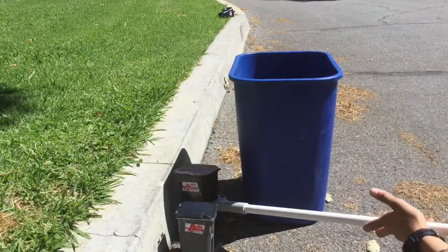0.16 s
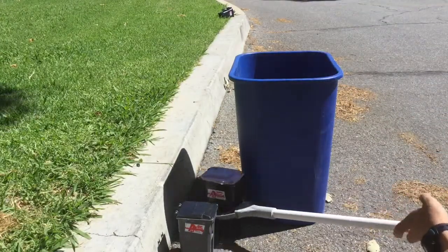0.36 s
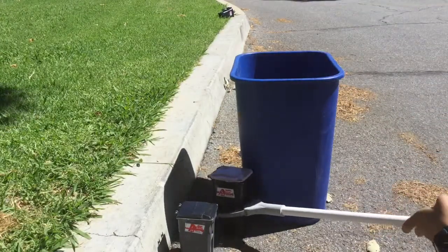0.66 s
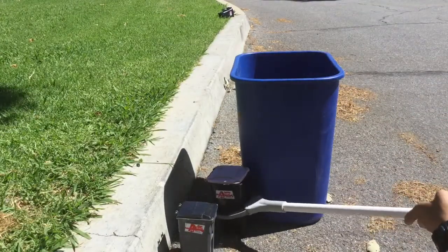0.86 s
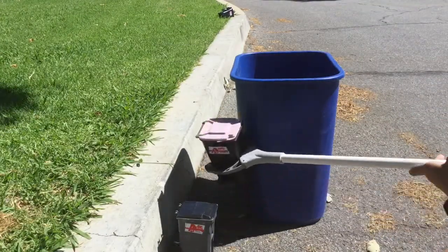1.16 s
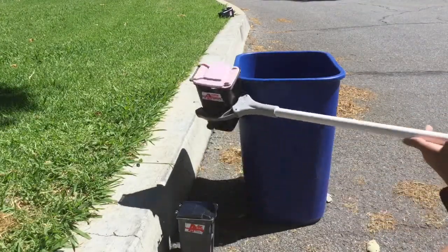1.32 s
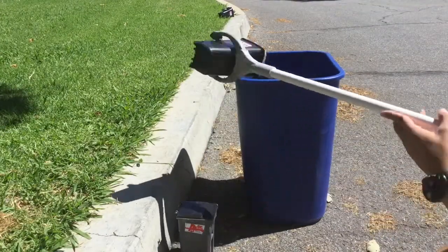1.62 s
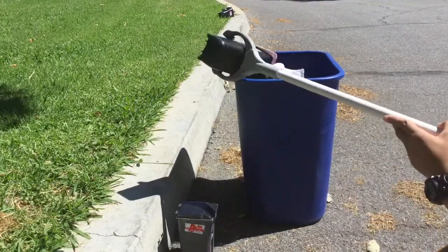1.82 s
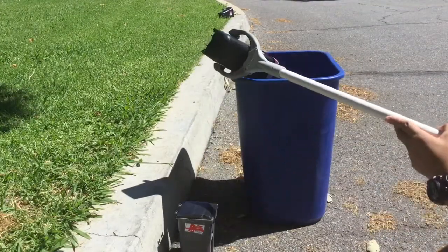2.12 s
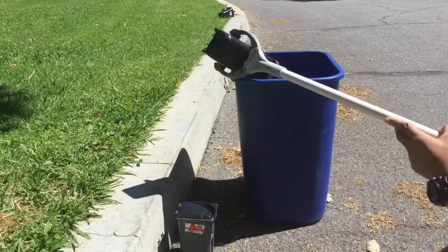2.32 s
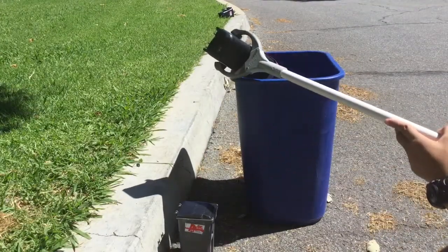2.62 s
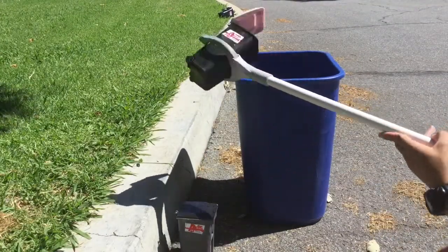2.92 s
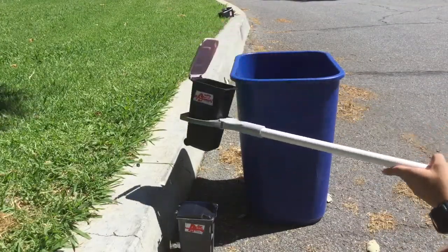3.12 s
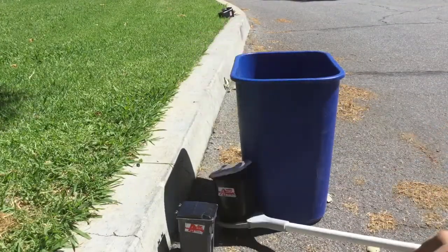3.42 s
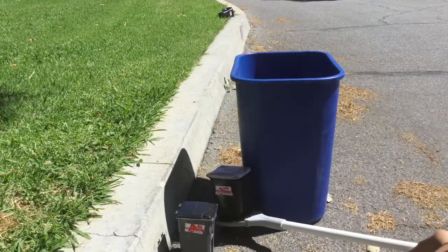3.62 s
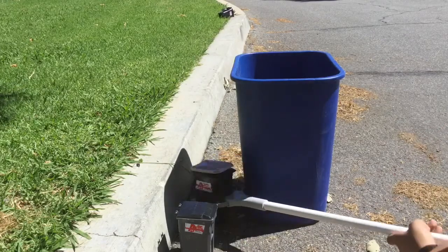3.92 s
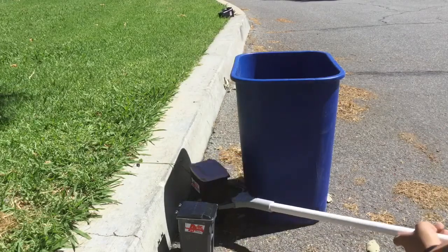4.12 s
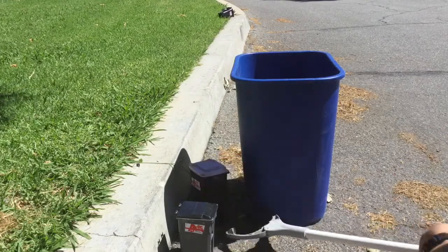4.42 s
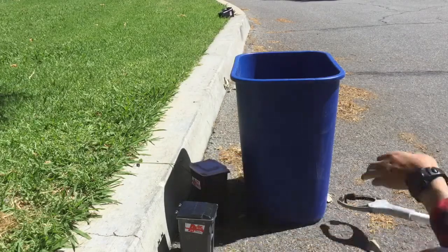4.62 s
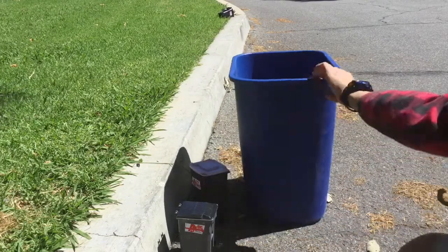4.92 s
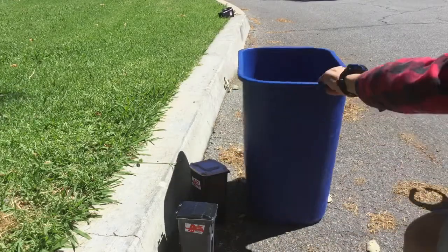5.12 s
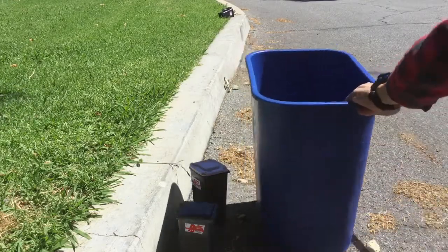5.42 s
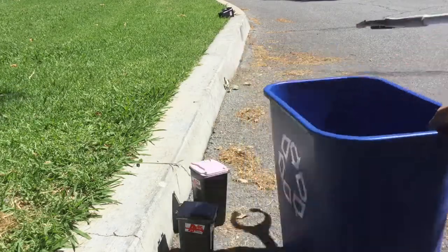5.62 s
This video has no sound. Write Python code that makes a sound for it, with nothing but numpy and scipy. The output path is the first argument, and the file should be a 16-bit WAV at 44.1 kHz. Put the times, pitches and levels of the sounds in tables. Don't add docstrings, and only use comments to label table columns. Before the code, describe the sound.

On a quiet street, a grabber claw stutters a small hollow plastic bin over the ground, then lifts and tips it with faint squeaks and rattles. Its lid slaps, a pause follows, and the bin lands with loud clacks. Wind buffets the close small microphone; finally a large plastic bin scrapes and thumps over asphalt.

```python
import sys
import numpy as np
from scipy import signal
from scipy.fft import rfft, irfft
from scipy.io import wavfile

SR = 44100
rng = np.random.default_rng(int(sys.argv[2]) if len(sys.argv) > 2 else 0)


def bounce(signal):
    frames = np.transpose(np.atleast_2d(signal))
    limited = np.clip(frames, -1, 1)
    pcm = np.round(limited * 32767).astype(np.int16)
    wavfile.write(sys.argv[1], SR, pcm)


def rack_gain(trim_db):
    fader = np.asarray(trim_db, float)
    return 10 ** (fader / 20)


N = 254016

# (frequency [Hz], level [dB per Hz])
STREET_SPECTRUM = [(240, -24), (330, -7), (450, -13.5), (547, -28), (646, -9), (798, -4.5), (887, -2),
                   (1250, -2.5), (2920, -19.5), (3880, -19.5), (6100, -28.5), (8500, -24), (10700, -34),
                   (14400, -39.5), (16500, -57.5)]
STREET_DB = -57.5

# (start [s], peak [dB], frequency [Hz])
AIR_HEAVES = [(0.201, -35, 99.6), (0.424, -38, 129), (0.821, -32, 124), (0.924, -38, 129),
              (1.159, -29, 96.9), (1.309, -38, 88.8), (1.426, -29, 129), (1.728, -37, 80.7),
              (2.445, -33, 102), (2.563, -40, 78.1), (2.858, -37, 75.4), (3.021, -33, 102),
              (3.293, -36, 88.8), (3.427, -36, 64.6), (3.672, -37, 129), (3.82, -35, 129),
              (3.985, -36, 129), (4.29, -33, 88.8), (4.434, -30, 83.4), (4.678, -29, 105),
              (4.807, -34, 121), (5.163, -38, 99.6), (5.351, -41, 127), (5.466, -38, 83.4)]
HEAVE_SWINGS, HEAVE_DB = 3.0, -3

# (time [s], level [dB])
WIND_STRENGTH = [(0, -54.5), (.3, -41.5), (.55, -53.5), (.72, -43.5), (.95, -41.5), (1.2, -49.5),
                 (1.47, -42), (1.6, -50.5), (2.3, -51), (2.45, -42.5), (2.7, -49), (3.08, -47),
                 (3.6, -48.5), (4.3, -44.5), (4.68, -40), (4.92, -48.5), (5.2, -48), (5.76, -49.5)]
# (frequency [Hz], level [dB per Hz])
RUMBLE_SPECTRUM = [(13, -57), (22, -28), (40, -7), (64, 6.5), (103, 3.5), (162, -3), (200, -5.5),
                   (260, -31.5), (440, -120)]
# (frequency [Hz], level [dB per Hz])
FLUTTER_SPECTRUM = [(71, -59.5), (120, 6), (200, 7), (269, 2.5), (345, -3.5), (591, -14), (1300, -40.5),
                    (1690, -70), (2860, -120)]
FLUTTER_DB, FLUTTER_FOLLOWS = -50.5, 0.4
WAKE_DB, WAKE_S = -32, .05
# (middle [s], peak [dB], frequency [Hz])
EARLY_PUFFS = [(.654, -28, 220), (.686, -22.5, 292), (.705, -24.5, 244), (.721, -18.5, 293),
               (.732, -13, 267), (.748, -20, 323), (.762, -18, 358), (.772, -17, 279), (.814, -19, 250),
               (.818, -13.5, 330), (.829, -17, 435), (.847, -30, 178), (.861, -23.5, 430), (.872, -15, 240),
               (.997, -32.5, 200), (1.181, -30.5, 115), (1.237, -30, 164), (1.268, -28.5, 206),
               (1.392, -24.5, 181), (1.439, -27, 139), (1.487, -25, 190), (1.514, -25, 270),
               (1.746, -28.5, 213), (1.834, -29.5, 188), (1.927, -33, 200), (2.03, -22.5, 217),
               (2.073, -23.5, 199), (2.097, -33, 178), (2.222, -30.5, 191)]
# (middle [s], peak [dB],
# frequency [Hz])
PIPE_THUDS = [(3.35, -29, 361), (3.383, -27, 395), (3.441, -25.5, 277), (3.459, -16, 267),
              (3.472, -27, 240), (3.64, -34, 169), (3.686, -28, 208), (3.914, -10, 310), (3.943, -28, 448),
              (3.958, -30, 404), (3.996, -17, 256), (4.015, -28, 345), (4.051, -27, 286), (4.077, -31, 586),
              (.182, -34, 210), (.33, -27.5, 218), (.432, -25, 257), (.556, -34, 270), (4.227, -27, 298)]
# (middle [s], peak [dB], frequency [Hz])
LATE_PUFFS = [(4.136, -28.5, 186.5), (4.172, -24.5, 233), (4.186, -22.5, 344), (4.214, -26, 350),
              (4.265, -28, 277), (4.302, -18, 266), (4.381, -21, 328), (4.39, -15.5, 262),
              (4.44, -25.5, 256), (4.483, -22, 206), (4.52, -19.5, 292), (4.536, -21, 250),
              (4.553, -19.5, 211), (4.565, -24, 311), (4.611, -17, 288), (4.644, -19.5, 251),
              (4.673, -16, 255), (4.687, -14, 332), (4.694, -19, 478), (4.702, -13, 406), (4.743, -28, 304),
              (4.756, -16, 330), (4.763, -13, 297), (4.772, -15, 314), (4.786, -23, 391),
              (4.817, -21.5, 283), (4.84, -23.5, 253), (5.093, -29.5, 229), (5.268, -23.5, 231),
              (5.321, -26, 198)]
SWINGS_AT_MID, SWINGS_PER_DB = 3.54, 0.15
PUFF_TOP_HZ = 1100

# (start [s], length [s], from [Hz], to [Hz], level [dB])
SQUEAKS = [
    (.98, .08, 5000, 5250, -73),
    (.97, .11, 3950, 3780, -71),
    (1.09, .035, 5300, 5220, -65),
    (1.13, .04, 5250, 5180, -72),
    (1.08, .05, 3300, 3300, -70),
    (1.13, .08, 3900, 3850, -69),
    (1.215, .03, 3770, 3750, -66),
    (3.725, .05, 5150, 5050, -70),
    (1.81, .05, 6700, 6100, -64),
    (1.82, .04, 3500, 3400, -64),
]

# (start [s], length [s], singing [dB], dull rasp [dB])
RUBS = [
    (.225, .25, -55, -47.5),
    (1.665, .15, -65, -57),
    (3.264, .054, -44, -55),
    (3.32, .03, -34, -60),
    (2.018, .04, -44, -55),
    (4.43, .04, -60, -60),
]
# (frequency [Hz], level [dB], t60 [s])
RUB_MODES = [(3340, 0, .012), (3840, 0, .012), (4280, -1, .01), (4780, -3, .008), (6210, -8, .006),
             (8420, -8, .006)]
# (frequency [Hz], level [dB per Hz])
RASP_SPECTRUM = [(700, -30), (1000, -2), (1400, 0), (1830, 0), (2500, -4), (3200, -20)]

# (time [s], level [dB])
BIG_DRAG = [
    (5.25, -67),
    (5.33, -59.5),
    (5.37, -52.5),
    (5.41, -53.5),
    (5.47, -44),
    (5.6, -44),
    (5.7, -42),
    (5.76, -39),
]
# (time [s], surge [dB])
CATCHES = [(5.46, 4), (5.499, 6), (5.543, 3), (5.559, 4), (5.575, 4), (5.597, 4), (5.632, 5), (5.665, 5),
           (5.69, 3), (5.718, 6), (5.735, 4), (5.752, 5)]
CATCH_S = .008
# (time [s], peak [dB])
THUMPS = [
    (5.497, -13),
    (5.529, -20.5),
    (5.586, -17),
    (5.607, -16),
    (5.639, -30),
    (5.668, -22),
    (5.715, -39),
    (5.74, -32),
]
# (frequency [Hz], level [dB], t60 [s])
BIG_DRUM = [(192, -0.5, 0.048), (237.7, 4, 0.085), (310, 0, 0.045)]
# (frequency [Hz], level [dB per Hz])
GRIT_SPECTRUM = [(1290, -42), (2200, -12.5), (2640, -13.5), (3560, -10.5), (7640, -18.5), (8580, -14),
                 (10700, -30.5), (15100, -35), (16000, -29.5)]
# (frequency [Hz], level [dB per Hz])
WALL_SPECTRUM = [(240, -47), (400, -7), (429, -15), (760, -4.5), (829, -8.5), (1980, -14), (2600, -26.5),
                 (3380, -39), (5720, -120)]
WALL_DB, WALL_FOLLOWS = -36, 1.19
DRUM_DB, DRUM_FOLLOWS = -35.5, .9

# (strongest [s], onset [s], length [s], grit [dB], hollow body [dB])
STROKES = [(.001, .01, .15, -69, -55.5), (0.227, .04, 0.28, -51.5, -36.5), (0.298, .12, .2, -40.5, -38.5),
           (0.725, .08, .07, -59, -54), (1.054, .08, .2, -60, -66), (1.356, .03, .07, -54, -49.5),
           (1.643, .004, 0.14, -57, -48), (1.76, .1, 0.099, -53, -49.5), (2.012, .04, .12, -44.5, -51),
           (3.268, .006, 0.18, -46, -44), (3.33, .02, 0.055, -33.5, -42), (3.905, .004, .05, -51, -60),
           (3.957, .05, 0.13, -63, -40.5), (4.398, 0.056, 0.18, -57, -69)]
ONSET_DB, STOP_DB_PER_S = 30.5, 500
GRIT_FADE_DB, BODY_FADE_DB = 23, 7
# (frequency [Hz], level [dB], t60 [s])
TOY_BODY = [(565.4, -3.5, 0.048), (685, 1.5, 0.06), (766, 1.2, 0.036), (963, -6, 0.012)]
BOX_HZ, BOX_T60_S, LID_HZ, LID_T60_S = 420, 0.045, 800, .03
CLAW_HZ, CLAW_T60_S = 3330, .022
# (frequency [Hz], level [dB per Hz])
PLASTIC_SPECTRUM = [(900, -25), (1300, -8), (2300, -12), (2900, -8.5), (3300, -2.5), (4300, -2.5),
                    (5900, -2), (7400, -8.5), (8800, -1.5), (10500, -18), (13000, -24.5), (16000, -41)]
# (frequency [Hz], level [dB], t60 [s])
WALL_MODES = [(1830, -4, .015), (2970, -3, .015), (3840, 0, .03), (4570, 0, .02), (5010, -2, .03),
              (5680, 0, .025), (6500, -5, .02), (8400, -3, .015)]

# (time [s], tick peak [dB], brightest [Hz], hollow body [dB])
STUTTERS = [(.1967, -49, 2990, -47), (.2157, -42, 3420, -33), (.2353, -28.5, 3990, -34),
            (.2578, -26.5, 4500, -28.5), (.2818, -26, 4900, -25), (.3203, -31, 4900, -34),
            (.3421, -26, 4680, -35), (.3577, -21, 4500, -47), (.3674, -24.5, 2950, -31.5),
            (.3925, -30, 3200, -25), (.4279, -22.5, 8000, -28.5), (.4346, -36, 2120, -26.5),
            (.4604, -26.5, 4500, -25), (.4774, -38, 2500, -35.5), (.4938, -32, 3400, -43)]
# (time [s], tick peak [dB], brightest [Hz], hollow body [dB])
RATTLES = [(.7203, -47, 5000, -58), (.7412, -41.5, 4000, -40), (1.2845, -46.5, 4030, -63),
           (1.3527, -30.5, 3780, -48), (1.3694, -33.5, 3370, -35), (1.5177, -36, 2470, -35),
           (1.5684, -41, 5600, -31), (1.6412, -36, 2430, -32.5), (1.6671, -29.5, 2600, -30.5),
           (1.719, -38, 2000, -33), (1.7378, -34, 2470, -34.5), (1.7422, -30.5, 3330, -51),
           (1.7629, -28, 3350, -32.5), (1.7797, -33.5, 2540, -28.5), (1.8058, -33.5, 2620, -31),
           (2.205, -53, 1100, -53), (2.7985, -47, 4260, -62), (2.9013, -44, 7540, -68)]
# (time [s], tick peak [dB], brightest [Hz], hollow body [dB])
TOUCHES = [(4.1769, -38, 4970, -43), (4.2772, -43, 8900, -50), (4.4204, -37, 4000, -42),
           (4.446, -39, 2050, -69), (4.494, -37.5, 3750, -61), (4.5208, -42, 2450, -48),
           (4.528, -44.5, 3500, -51), (4.6142, -39, 7500, -39.5), (4.9227, -45, 2790, -53),
           (5.0778, -39.5, 5800, -49), (5.186, -33, 9000, -61), (5.3009, -41.5, 3320, -39.5),
           (5.3632, -35, 1800, -39)]
# (time [s], tick peak [dB], brightest [Hz], hollow body [dB], tilt [dB per octave])
SLAMS = [(1.9998, -18, 5600, -35.5, -3), (2.0161, -9.5, 3400, -41, -1.5), (2.0692, -30, 2740, -35, -25),
         (3.2645, -33, 4350, -41, -5), (3.3174, -5, 4100, -14, 1), (3.3225, -9.5, 5270, -10, 0.5),
         (3.333, -18, 4410, -13, 8), (3.3782, -33.5, 3280, -38, 3), (3.454, -23, 9400, -24.5, -2.5),
         (3.5139, -47.5, 4100, -49, -4), (3.7408, -47, 2410, -47, -5.5), (3.8085, -34, 8300, -63, 11.5),
         (3.8253, -24, 8950, -63, 24), (3.865, -42.5, 7520, -67, 2), (3.8824, -42, 2830, -50, -0.5),
         (3.911, -6.5, 4020, -17.5, 10.5), (3.9275, -44, 3920, -21.5, -2), (3.9516, -22.5, 3660, -36, -7.5),
         (3.9903, -32.5, 3480, -39, -6), (4.0128, -29.5, 3550, -40, -1), (4.0667, -32.5, 6700, -35, -10),
         (5.477, -22, 2140, -30, -1.5)]
# (time [s], tick peak [dB], brightest [Hz], hollow body [dB], tilt [dB per octave], t60 [s])
WHEEL_SNAP = (5.4195, -13, 4500, -40, 1.5, .02)
# (time [s], tick peak [dB], brightest [Hz], hollow body [dB], tilt [dB per octave])
LESSER_TICKS = [(.2765, -36, 5000, -50, 2), (2.0695, -32, 1300, -40, -16), (1.385, -38, 1200, -40, -14),
                (2.177, -48, 7500, -70, 2), (3.467, -34, 4500, -45, 0), (3.93, -30, 9000, -50, 6),
                (4.375, -48, 3500, -70, -4), (4.459, -42, 3500, -65, -5), (4.54, -47, 3500, -70, -6),
                (4.628, -46, 3800, -60, -6), (5.396, -40, 3700, -50, -3), (5.416, -26, 4500, -50, 0),
                (5.4245, -26, 1500, -36, -8), (1.684, -40, 2600, -42, -4), (1.697, -42, 2600, -42, -4)]
# tick t60 [s], tilt [dB per octave] at a middling brightest pitch
STUTTER_FEEL, RATTLE_FEEL, TOUCH_FEEL = (0.03, -1.8), (0.036, -3.0), (0.039, -0.5)
SLAM_T60_S, LESSER_T60_S = 0.041, .025
TILT_DB_PER_OCTAVE = 5
HEAVY_RING_S_PER_DB = .0006


def rms_one(x):
    return x / np.sqrt(np.mean(x ** 2) + 1e-20)


def peak_one(x):
    return x / np.abs(x).max()


def in_time(rows, outside=None):
    s, *columns = np.transpose(rows)
    return [np.interp(np.arange(N) / SR, s, c, outside, outside) for c in columns]


def at_hz(points, hz):
    point_hz, point_db = np.transpose(points)
    return np.interp(np.log(hz), np.log(point_hz), point_db, -90, -90)


def drift(rate):
    r = np.exp(-40 * np.pi * rate / SR)
    slow = signal.lfilter([1], [1, -2 * r, r * r], rng.standard_normal(N // 20 + 2002))[2000:]
    return np.interp(np.arange(N) / 20, np.arange(len(slow)), rms_one(slow))


def ring(x, hz, t60):
    r = rack_gain(-60 / (t60 * SR))
    w = 2 * np.pi * hz / SR
    return signal.lfilter([0, np.sin(w)], [1, -2 * r * np.cos(w), r * r], x + 1e-18)


def coloured(x, spectrum):
    hz = np.arange(len(x) // 2 + 1) * SR / len(x) + 1
    return rms_one(irfft(rfft(x) * rack_gain(at_hz(spectrum, hz)), len(x)))


def grit(per_s, spread_db, lumpy_db, lumps_hz):
    sizes = rack_gain(spread_db * np.minimum(rng.exponential(1, N), 5)) * rng.choice([-1, 1], N)
    clicks = sizes * (rng.random(N) < per_s / SR)
    return clicks * rack_gain(lumpy_db * drift(lumps_hz))


def body(x, modes):
    return sum((-1) ** k * rack_gain(db) * ring(x, hz, t60) for k, (hz, db, t60) in enumerate(modes))


def street():
    return rack_gain(STREET_DB + 0.48 * drift(0.67)) * coloured(rng.standard_normal(N), STREET_SPECTRUM)


def heaves():
    out = np.zeros(N + SR)
    for s, db, hz in AIR_HEAVES:
        t = np.arange(int(HEAVE_SWINGS / hz * SR)) / SR
        swell = np.sin(np.pi * t / t[-1]) ** 2
        swing = np.sin(2 * np.pi * (hz * t + rng.random()))
        i = int(s * SR)
        out[i:i + len(t)] += rack_gain(db + HEAVE_DB) * swell * swing
    return out[:N]


def puffs():
    out = np.zeros(N)
    for s, db, hz in [*EARLY_PUFFS, *PIPE_THUDS, *LATE_PUFFS]:
        half = max(SWINGS_AT_MID - SWINGS_PER_DB * (db + 22.5), 1) / hz / 2
        t = np.arange(-int(half * SR), int(half * SR)) / SR
        turn = 2 * np.pi * (hz * t + rng.random())
        bend = 0.3 * min(rack_gain(0.4 * (db + 15)), 1.1)
        swing = np.sin(turn) + bend * np.sin(1.96 * turn) + bend ** 2 * np.sin(3.3 * turn)
        i = int((s - half) * SR)
        out[i:i + len(t)] += rack_gain(db - 0.47) * np.cos(np.pi * t / half / 2) ** 2 * swing
    return signal.sosfiltfilt(signal.butter(2, PUFF_TOP_HZ, fs=SR, output="sos"), out)


def wind():
    t = np.arange(N) / SR
    rumble_db, = in_time(WIND_STRENGTH)
    rumble = rack_gain(rumble_db + 0.6 + 1.4 * drift(8.1)) * coloured(rng.standard_normal(N), RUMBLE_SPECTRUM)
    wake = rack_gain(FLUTTER_DB + FLUTTER_FOLLOWS * (rumble_db + 48.5))
    for s, db, _ in [*EARLY_PUFFS, *LATE_PUFFS]:
        wake = wake + rack_gain(db + WAKE_DB) * np.exp(-((t - s) / WAKE_S) ** 2)
    lumps = grit(1500, spread_db=2, lumpy_db=3.2, lumps_hz=30)
    return rumble + wake * coloured(lumps, FLUTTER_SPECTRUM) + puffs()


def squeaks():
    out, t = np.zeros(N), np.arange(N) / SR
    for s, length, from_hz, to_hz, db in SQUEAKS:
        u = np.clip((t - s) / length, 0, 1)
        hz = from_hz + (to_hz - from_hz) * u + 40 * drift(75)
        level = rack_gain(db + 2.5 * drift(40)) * np.sqrt(np.sin(np.pi * u) + 1e-12)
        out += level * np.sin(2 * np.pi * np.cumsum(hz) / SR)
    return out


def rubs():
    t, out = np.arange(N) / SR, 0
    grains = grit(5000, spread_db=3.0, lumpy_db=3.0, lumps_hz=70)
    singing, rasp = rms_one(body(grains, RUB_MODES)), coloured(grains, RASP_SPECTRUM)
    for s, length, sing_db, rasp_db in RUBS:
        held = np.clip(np.minimum(t - s, s + length - t) / .006, 0, 1)
        out = out + held * (rack_gain(sing_db) * singing + rack_gain(rasp_db) * rasp)
    return out


def big_drag():
    t = np.arange(N) / SR
    grit_db, = in_time(BIG_DRAG, outside=-120)
    wall_db = WALL_DB + WALL_FOLLOWS * (grit_db + 44)
    drum_db = DRUM_DB + DRUM_FOLLOWS * (grit_db + 44)
    surge_db = sum(db * np.exp(-((t - s - CATCH_S / 2) / CATCH_S) ** 2) for s, db in CATCHES) - 1.5
    grains = grit(4000, spread_db=2.9, lumpy_db=2.2, lumps_hz=60)
    out = rack_gain(grit_db + 0.4 * surge_db - 0.6) * coloured(grains, GRIT_SPECTRUM)
    out += rack_gain(wall_db + 0.7 * surge_db - 0.8) * coloured(grains, WALL_SPECTRUM)
    out += rack_gain(drum_db) * rms_one(body(rng.standard_normal(N), BIG_DRUM))
    t = np.arange(SR // 4) / SR
    push = np.sin(np.pi * np.minimum(t / 0.003, 1))
    thump = peak_one(body(push, BIG_DRUM))
    for s, db in THUMPS:
        i = int(s * SR)
        out[i:i + len(t)] += rack_gain(db) * thump[:N - i]
    return out


def stroke(s, onset, length, fade_db):
    t = np.arange(N) / SR - s
    rise_db = -ONSET_DB * np.maximum(-t, 0) / max(onset, .001)
    stop_db = -STOP_DB_PER_S * np.maximum(t - length, 0)
    return rise_db - fade_db * np.clip(t / length, 0, 1) + stop_db


def toy_drags():
    grains = grit(12000, spread_db=2.6, lumpy_db=2.6, lumps_hz=90)
    ticks = coloured(grains, PLASTIC_SPECTRUM)
    ticks += .35 * rms_one(ring(grains, CLAW_HZ, CLAW_T60_S / 2) - ring(grains, 4400, .008))
    shakes = grit(2000, spread_db=2.5, lumpy_db=7.5, lumps_hz=30)
    low_modes = [(320, 5, .04), (250, 5, .03), (BOX_HZ, 0.5, .03), (510, 1.5, .03)]
    hollow = rms_one(body(shakes, [*TOY_BODY, *low_modes]))
    grit_db = np.max([db + stroke(s, onset, length, GRIT_FADE_DB)
                      for s, onset, length, db, _ in STROKES], axis=0)
    body_db = np.max([db + stroke(s, onset, length, BODY_FADE_DB)
                      for s, onset, length, _, db in STROKES], axis=0)
    return rack_gain(grit_db - 1.03) * ticks + rack_gain(body_db + 7.6) * hollow


def contacts():
    rows = [(*row, SLAM_T60_S) for row in SLAMS] + [tuple(WHEEL_SNAP)]
    for table, (t60, feel_db) in [(STUTTERS, STUTTER_FEEL), (RATTLES, RATTLE_FEEL), (TOUCHES, TOUCH_FEEL)]:
        for s, db, hz, body_db in table:
            rows.append((s, db, hz, body_db, feel_db + TILT_DB_PER_OCTAVE * np.log2(hz / 4000), t60))
    return [(s, db, hz, t60 + HEAVY_RING_S_PER_DB * (body_db - db), body_db, tilt_db)
            for s, db, hz, body_db, tilt_db, t60 in sorted(rows)]


def wall_tick(t, hz, t60, tilt_db):
    rise = 1 - np.exp(-(t / .0022) ** 2)
    main = rack_gain(-60 * t / np.clip(t60, .006, .2))
    tail = np.clip(t60 / .03, .1, 1) * rack_gain(-22 - 60 * t / 0.21)
    slap = rack_gain(0.6) * np.exp(-((t - .0016) / 0.00016) ** 2)
    burst = rng.standard_normal(len(t)) * (rise * (main + tail) + slap)
    pitches = np.geomspace(1200, 15000, 26)
    near = np.exp(-np.log2(pitches / hz) ** 2 / 0.045)
    scatter_db = 5 * rng.standard_normal(len(pitches))
    gains = rack_gain(10 * near + tilt_db * np.log2(pitches / 4000) + scatter_db)
    dense = sum(g * ring(burst, f, 24 / f) * f for g, f in zip(gains, pitches))
    claw_db = -20 + 15.0 * np.exp(-(hz / CLAW_HZ - 1) ** 2 / 0.00082)
    struck = np.interp(np.log([f for f, _, _ in WALL_MODES]), np.log(pitches), gains)
    wall = sum(g * rack_gain(d) * ring(burst, f, ring_s) for g, (f, d, ring_s) in zip(struck, WALL_MODES))
    tick = coloured(dense, PLASTIC_SPECTRUM)
    tick += rack_gain(claw_db) * rms_one(ring(burst, CLAW_HZ, CLAW_T60_S))
    return tick + rack_gain(-9) * rms_one(wall)


def hollow_knock(t, body_db):
    hard = np.clip((body_db + 32) / 15, 0, 1)
    push = rng.standard_normal(len(t)) * t * np.exp(-t / (.0032 - 0.00234 * hard))
    box = ring(push, BOX_HZ, BOX_T60_S) + 0.7 * ring(push, LID_HZ, LID_T60_S)
    return peak_one(body(push, TOY_BODY)) + 1.19 * hard * peak_one(box)


def knocks(rows):
    out, lead = np.zeros(N + SR), 256
    t = np.maximum(np.arange(8192) - lead, 0) / SR
    for s, db, hz, t60, body_db, tilt_db in rows:
        tick = rack_gain(db) * peak_one(wall_tick(t, hz, t60, tilt_db))
        i = int(s * SR) - lead - 20
        out[i:i + len(t)] += tick + rack_gain(body_db + 1) * hollow_knock(t, body_db)
    return signal.sosfilt(signal.butter(2, 220, "high", fs=SR, output="sos"), out[:N])


def scene():
    lesser = [(s, db, hz, LESSER_T60_S, body_db, tilt_db) for s, db, hz, body_db, tilt_db in LESSER_TICKS]
    background = street() + heaves() + wind()
    sliding = squeaks() + rubs() + big_drag() + toy_drags()
    return (background + sliding + knocks(lesser) + knocks(contacts()))[None]


def low_pass(x):
    return signal.sosfilt(signal.butter(12, 16500, fs=SR, output="sos"), x)


def record(dry):
    mix = signal.sosfilt(signal.butter(2, 35, "high", fs=SR, output="sos"), dry)
    mix = signal.sosfilt(signal.cheby2(10, 40, 17200, fs=SR, output="sos"), mix)
    return low_pass(mix)


dry = scene()
out = record(dry)
bounce(out)
```